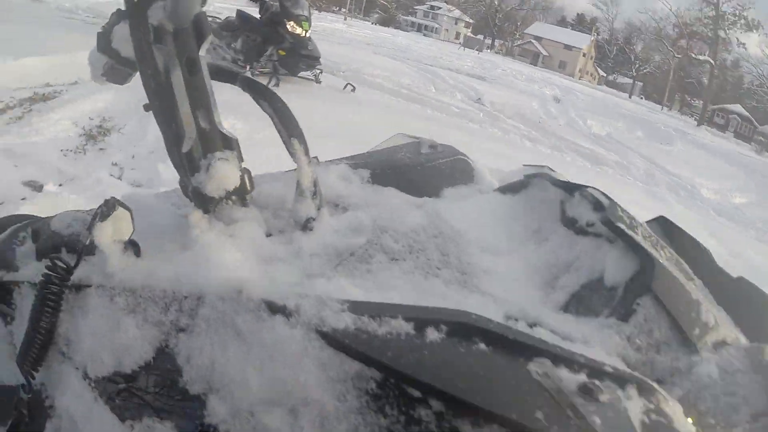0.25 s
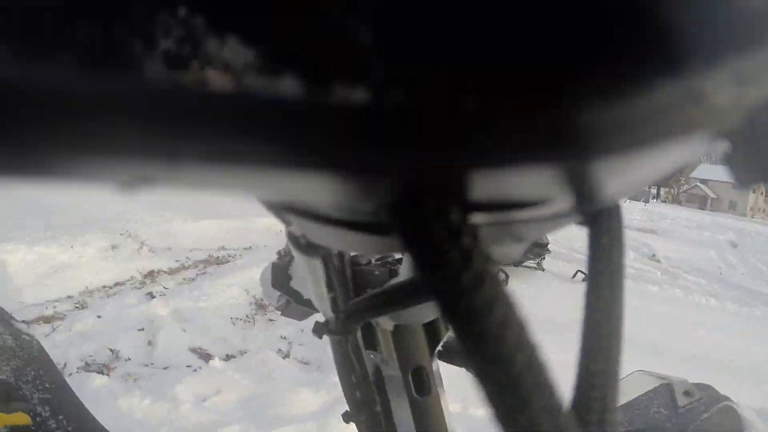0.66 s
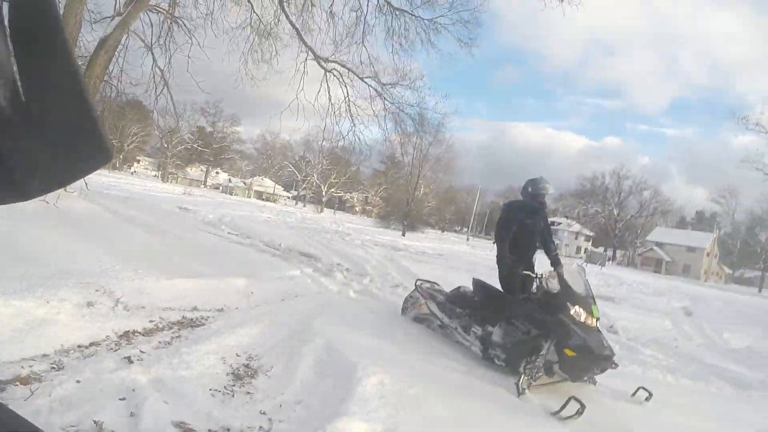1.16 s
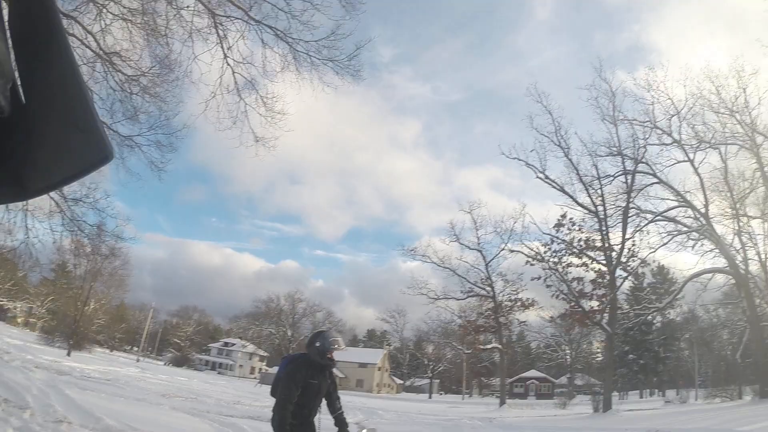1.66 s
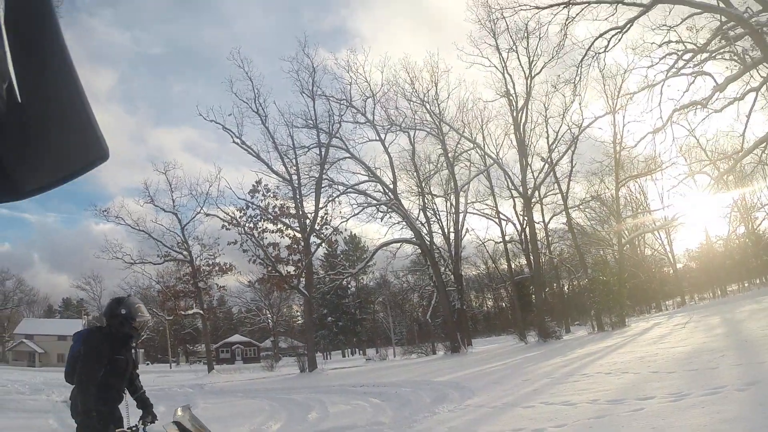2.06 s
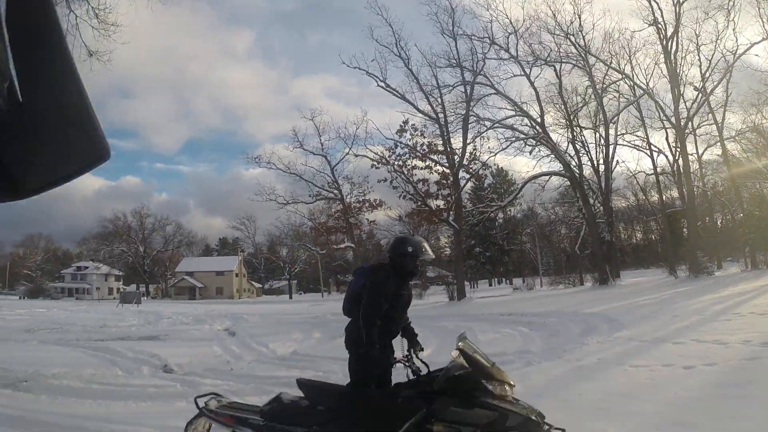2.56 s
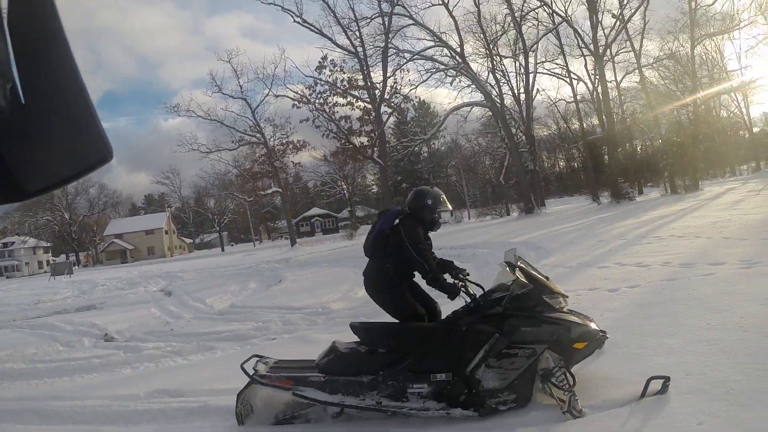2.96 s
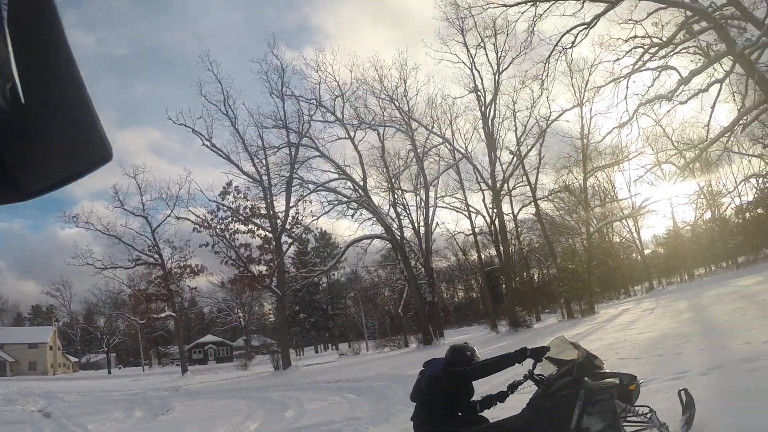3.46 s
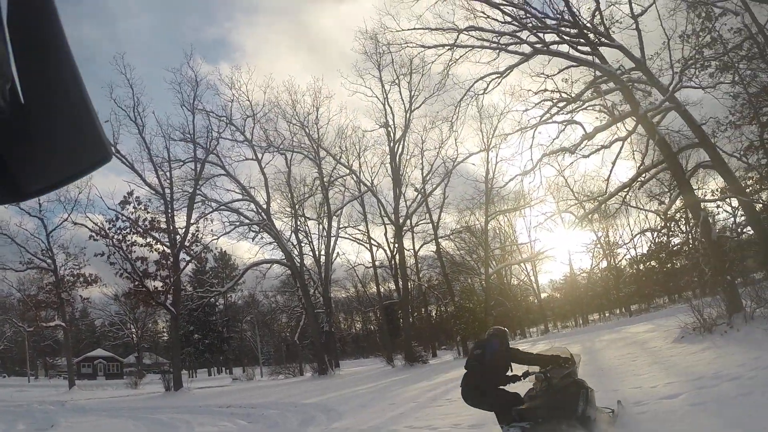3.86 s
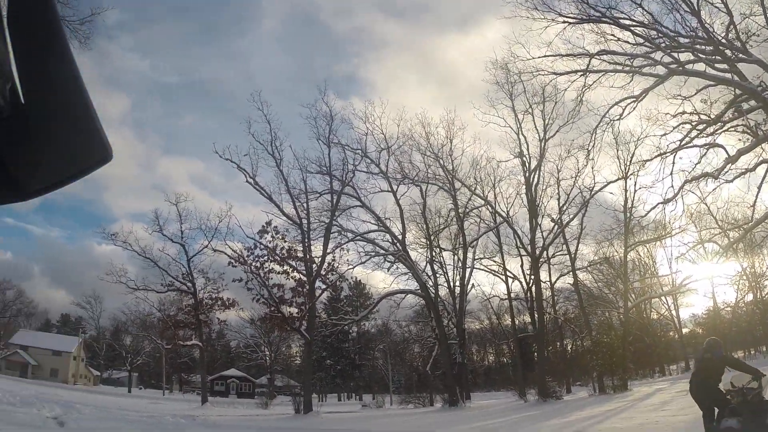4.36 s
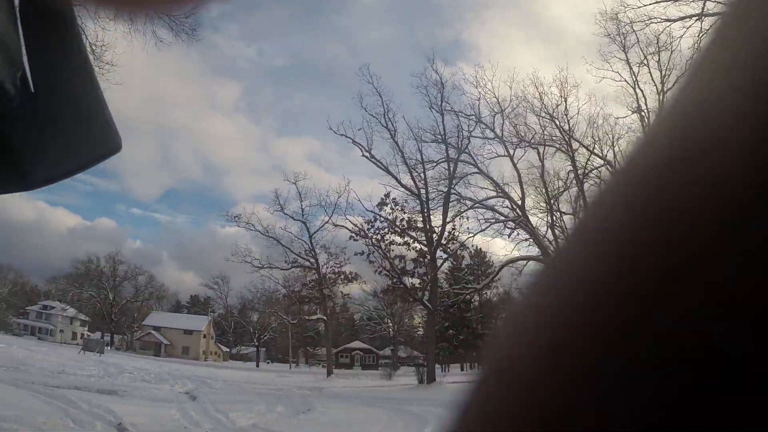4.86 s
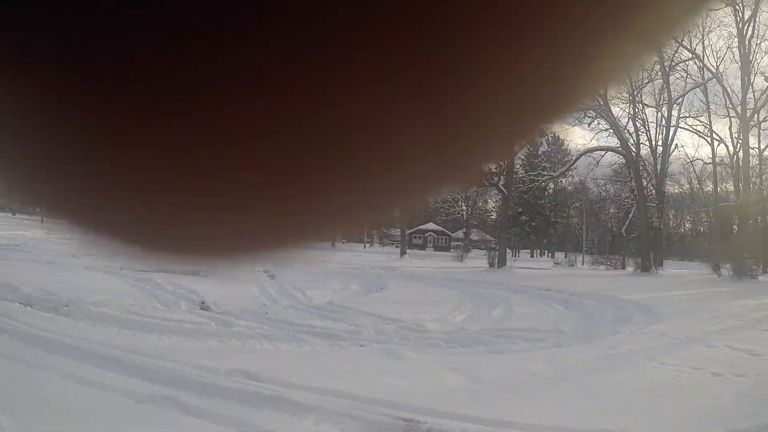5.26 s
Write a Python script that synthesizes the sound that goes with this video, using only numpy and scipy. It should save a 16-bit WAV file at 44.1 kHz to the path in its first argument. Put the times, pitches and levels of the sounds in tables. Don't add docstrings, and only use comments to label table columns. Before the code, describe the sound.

A nearby two-stroke snowmobile idles with a low, steady putter and soft clatter in an open snowy field, heard through a plastic camera housing. At about 0.2 s gloved hands grab the camera: hard knocks, hollow drumming, deep thumps and rough scraping, with especially heavy blows near 0.3, 0.55 and 0.67 s, and a firm rub just before 1 s. Afterward the idle is ducked and faint, swelling back by about 1.8 s, with thin hiss and a very faint high whine. From about 2.2 s a second snowmobile emerges, its buzz climbing and turning raspy from 3.2 s, peaking around 3.5-3.6 s with bark, airy hiss and drive hum, then dropping in pitch and fading by 4.1 s. The idle continues quietly with a faint brush. At 4.87 s loud knocks, thumps and scrapes return, thinning after 5.2 s into small ticks, low bumps and gentle rubbing until the end at 5.5 s.

```python
import sys
import numpy as np
from scipy import signal
from scipy.fft import rfft, irfft, next_fast_len
from scipy.io import wavfile
from scipy.ndimage import map_coordinates

SR = 44100
rng = np.random.default_rng(int(sys.argv[2]) if len(sys.argv) > 2 else 0)


def decibels_to_gain(level_db):
    exponent = np.asarray(level_db, float) / 20
    return 10 ** exponent


def bounce(signal):
    frames = np.transpose(np.atleast_2d(signal))
    limited = np.clip(frames, -1, 1)
    pcm = np.round(limited * 32767).astype(np.int16)
    wavfile.write(sys.argv[1], SR, pcm)


N = 242991
TIME = np.arange(N) / SR
GRID = np.fft.rfftfreq(next_fast_len(N + SR // 2), 1 / SR)

# (centre [Hz], width [Hz], level [dB])
SHELL_MODES = [(1038, 150, -13), (1327, 110, -7.5), (1640, 185, 0), (2404, 268, -1), (2920, 410, -7),
               (3600, 220, -0.5), (4460, 160, 0.5), (5470, 1100, -7), (6950, 2100, -14),
               (10000, 5000, -20.5)]


def unit(x):
    return x / np.sqrt(np.mean(x ** 2) + 1e-20)


def curves(rows, outside=None):
    seconds, *columns = np.transpose(rows)
    return [np.interp(TIME, seconds, column, outside, outside) for column in columns]


def wobble(rate):
    knots = rng.standard_normal(int(N * rate / SR) + 4)
    return map_coordinates(knots, [TIME * rate])


def filtered(x, response):
    size = 2 * (len(GRID) - 1)
    return irfft(rfft(x, size) * response, size)[:N]


def colour(points):
    hz, db = np.transpose(points)
    return decibels_to_gain(np.interp(np.log(GRID + 1), np.log(hz + 1), db, -120, -120))


def lifted(peaks):
    return decibels_to_gain(sum(db / (1 + (2 * (GRID - hz) / width) ** 2) for hz, width, db in peaks))


def modes(rows):
    total = 0
    for k, (hz, width, db) in enumerate(rows):
        damping = 1j * GRID * width
        total = total + (-1) ** k * decibels_to_gain(db) * damping / (hz * hz - GRID * GRID + damping)
    return total


def tone(turns, rough_db):
    strength = np.sqrt(2) * decibels_to_gain(rough_db * wobble(14))
    drift = 0.16 * rough_db * wobble(13) + rng.uniform(0, 8.05)
    return strength * np.sin(2 * np.pi * turns + drift)


def puffs(turns, depth, response):
    sizes = decibels_to_gain(2.5 * rng.standard_normal(int(turns[-1]) + 2))
    burst = sizes[turns.astype(int)] * 3 * np.exp(-3 * (turns % 1))
    gate = 1 - depth + depth * burst
    return unit(filtered(gate * rng.standard_normal(N), response))


def pulses(turns, scatter_db, response):
    at = np.flatnonzero(np.diff(np.floor(turns)))
    train = np.zeros(N)
    train[at] = decibels_to_gain(scatter_db * rng.standard_normal(len(at)))
    t = TIME[:SR // 40]
    smear = rng.standard_normal(len(t)) * decibels_to_gain(-60 * t / .035)
    return unit(filtered(signal.fftconvolve(train, smear)[:N], response))


def idling():
    # (time [s], exhaust [dB], clatter [dB])
    loudness = [(0, -38.5, -50.5), (.2, -42, -53.5), (1.0, -34.5, -49), (1.4, -43.5, -56), (1.7, -45, -58),
                (2.0, -41, -58), (2.4, -37.5, -51.5), (3.0, -42, -55), (3.6, -45, -48), (3.95, -46.5, -59),
                (4.2, -47.5, -58.5), (4.4, -46.5, -59), (4.7, -48.5, -60), (4.85, -53, -54.5),
                (5.51, -44.5, -61)]
    # (time [s], shaft turns a second [Hz])
    shaft_speed = [(0, 40.8), (1.5, 40), (2.6, 39.03), (3.5, 39.55), (4.1, 40.4), (5.51, 39.49)]
    # (multiple of shaft speed, level [dB])
    pipe_orders = [(1, -5.5), (2, 1.5), (3, -8), (4, -17.5), (5, -15), (6, -18.5), (7, -11.5), (8, -18),
                   (9, -33.5), (10, -16.5), (11, -13.5), (12, -16.5)]
    # (frequency [Hz], level per Hz [dB])
    clatter_colour = [(59, -38), (100, 2), (218, -5), (269, -4.5), (485, -3.5), (574, -15), (665, -14),
                      (971, -15.5), (2030, -12), (4240, -22), (15300, -46.5)]
    # (centre [Hz], width [Hz], lift [dB])
    port_peaks = [(1595, 300, 4), (2104, 600, 1.5), (2860, 78, 1), (3200, 200, 7.5), (3700, 160, 7),
                  (5700, 420, 7.5), (9800, 300, 7)]
    exhaust_db, clatter_db = curves(loudness)
    turns = np.cumsum(curves(shaft_speed)[0] * (1 + 0.0075 * wobble(6))) / SR
    pipe = sum(decibels_to_gain(db) * tone(k * turns, rough_db=1.5) for k, db in pipe_orders)
    clatter = puffs(turns, 0.17, colour(clatter_colour) * lifted(port_peaks))
    clatter = clatter * decibels_to_gain(1.4 * wobble(7))
    return decibels_to_gain(exhaust_db) * unit(pipe) + decibels_to_gain(clatter_db + 6.5) * clatter


def camera_noise():
    whine = decibels_to_gain(-85 + 2.5 * wobble(45)) * tone(13906 * TIME, rough_db=-2.0)
    hiss_colour = colour([(2000, -14.5), (8000, 0.5), (15000, -10.5), (15300, -32)])
    hiss = unit(filtered(rng.standard_normal(N), hiss_colour))
    return whine + decibels_to_gain(-80.5) * hiss


def shaking():
    # (time [s], sway [dB], judder [dB])
    unsteadiness = [(0.0, -45, -43), (0.17, -39.5, -43), (0.28, -17, -10.5), (0.9, -27.5, -27.5),
                    (0.93, -32, -9), (1.27, -49.5, -55.5), (1.96, -33.5, -35.5), (2.01, -40, -45),
                    (2.87, -32.5, -35.5), (3.13, -43.5, -48), (4.8, -42.5, -46), (4.88, -15.5, -7.5),
                    (5.09, -35, -38), (5.22, -16.5, -32), (5.37, -28, -46), (5.51, -22, -32)]
    # (time [s], level [dB], pitch [Hz], time to fall 60 dB [s], direction [sign])
    thumps = [(0.223, -17, 60.3, 0.061, 1), (0.256, 2.5, 70, 0.015, 1), (0.273, -3, 45.3, 0.087, -1),
              (0.297, -5.5, 40, 0.11, -1), (0.358, -8, 34.7, .1, -1), (0.426, -10, 55.9, 0.24, -1),
              (0.5508, 17.5, 183.6, 0.0088, 1), (0.572, -5.5, 60, 0.02, -1), (0.675, -7, 114, 0.031, -1),
              (0.699, -9.5, 97.6, 0.03, 1), (0.736, -10.5, 70.2, 0.035, -1), (.746, -15, 158, 0.061, 1),
              (0.419, -26, 195.8, 0.16, 1), (0.934, -4.5, 66.3, 0.041, 1), (0.981, -22.5, 54.5, 0.29, 1),
              (1.8, -35, 62, 0.52, 1), (2.82, -22, 64.17, 0.26, -1), (2.893, -22.5, 39.8, 0.17, 1),
              (4.874, -0.5, 73, 0.025, -1), (4.8765, -3.5, 246, 0.013, -1), (4.887, -1.5, 21.6, 0.077, 1),
              (4.989, -20, 61, 0.12, -1), (5.212, -9, 33, 0.079, -1), (5.484, -10, 69.4, 0.054, -1)]
    sway_db, judder_db = curves(unsteadiness)
    sway_colour = colour([(10, -3), (27, 5), (45, -5.5), (65, -27.5)])
    judder_colour = colour([(45, -10), (62, -4), (105, -16), (150, -24), (400, -44.5)])
    sway = unit(filtered(rng.standard_normal(N), sway_colour))
    judder = unit(filtered(rng.standard_normal(N), judder_colour))
    pushes, t = np.zeros(N + SR), TIME[:SR // 2]
    for start, db, hz, t60, way in thumps:
        onset = 1 - np.exp(-(t * hz * 5) ** 2)
        swing = np.sin(2 * np.pi * hz * t) * decibels_to_gain(db - 60 * t / t60) * onset
        pushes[round(start * SR):][:len(t)] += 1.64 * np.sign(way) * swing
    return decibels_to_gain(sway_db - 3) * sway + decibels_to_gain(judder_db - 8) * judder + pushes[:N]


def rubbing():
    # (time [s], scrape [dB], drumming of the wall over the scrape [dB])
    strokes = [
        [(.21, -39, -13), (.225, -22.5, 0), (.245, -45.5, 10), (.26, -30.5, -4), (.285, -42, 1),
         (.3, -28.5, 11.5), (.345, -49, 14), (.365, -30, 5), (.395, -55.5, 25), (.43, -35, -8), (.47, -56, 15)],
        [(.555, -34, 14), (.59, -52, -14), (.63, -39.5, -8), (.665, -46, -4), (.7, -74, 3), (.75, -48.5, 6),
         (.8, -65, -2), (.835, -41, 12.5)],
        [(.835, -61, -6), (.855, -30.5, 2), (.89, -33, -1.5), (.92, -24.5, -7), (.945, -22.5, -18),
         (.96, -30, -1), (.972, -25.5, 0.5), (.99, -70, -7)],
        [(1.68, -73, 13), (1.78, -54.5, 10), (1.85, -49.5, 5), (1.95, -62, 11)],
        [(4.25, -67, -9), (4.33, -49.5, 3.5), (4.5, -63, -16), (4.56, -66, 0)],
        [(4.865, -21, -15), (4.89, -41.5, -12), (4.905, -24, -20), (4.935, -33, -36), (4.965, -52, -15),
         (4.99, -33, -4), (5.01, -34.5, -3.5), (5.055, -29.5, -19), (5.095, -39, -16), (5.165, -40, -22)],
        [(5.165, -49, -7), (5.25, -43.5, -3), (5.32, -52, -30), (5.4, -49.5, -27.5), (5.45, -44.5, -20),
         (5.51, -51, -18)],
    ]
    # (wall [Hz], wall width [Hz], shell peak [Hz], brightness [dB per octave])
    grips = [(501, 44, 1350, -3), (466, 370, 1300, 5.5), (780, 160, 1720, -1), (267, 250, 4200, 4),
             (300, 280, 1530, -9), (250, 150, 2780, 5), (249, 170, 2700, 3.5)]
    # (frequency [Hz], level per Hz [dB])
    scrape_colour = [(530, -36.5), (900, -13), (1180, -11), (1690, -1), (2480, -3), (3380, -10),
                     (3670, -14.5), (8440, -29.5), (14100, -61), (15500, -47)]
    grains = rng.standard_normal(N) * decibels_to_gain(2.2 * wobble(90) + 2.7 * wobble(500))
    grains = grains * (1 + 9 * (rng.random(N) < 70 / SR))
    body = colour(scrape_colour) * np.abs(modes(SHELL_MODES)) ** 0.2
    out = np.zeros(N)
    for stroke, (wall_hz, width, peak_hz, bright_db) in zip(strokes, grips):
        scrape_db, drum_db = curves(stroke)
        peak = lifted([(peak_hz, 0.046 * peak_hz, 8)])
        tilt = decibels_to_gain(bright_db * np.log2(GRID / 2000 + .1))
        shell = unit(filtered(grains, body * peak * tilt))
        wall = unit(filtered(grains, modes([(wall_hz, width, 0)]) ** 1.41))
        fade_in = np.clip((TIME - stroke[0][0]) / 0.008, 0, 1)
        fade_out = np.clip((stroke[-1][0] - TIME) / 0.003, 0, 1)
        out += fade_in * fade_out * decibels_to_gain(scrape_db) * (shell + decibels_to_gain(drum_db) * wall)
    return out


def knocking():
    # (time [s], peak [dB], drum [dB], tick [dB], contact [s], drum pitch [Hz])
    knocks = [(0.2189, -8.5, -6, -13.5, 0.0086, 510), (0.254, -21, 1.5, -1.5, 0.037, 525),
              (0.2654, -31, 9, 3, 0.026, 585), (0.294, -1, -12.5, -12, 0.021, 480),
              (0.3007, -6, -1.5, -12, 0.028, 496), (0.3164, -16, -4.5, -6, 0.017, 490),
              (0.3213, -14.5, -4, -7.5, 0.021, 567), (0.3344, -23, -1, -6, 0.015, 607),
              (0.3593, -15.5, -3, -9.5, 0.03, 486), (0.4027, -21, -2, -1.5, 0.029, 546),
              (0.4239, -16.5, -11, -17, 0.013, 680), (0.4352, -40.5, 9, -8, 0.013, 510),
              (0.5503, 7, -16, -16.5, 0.0065, 470), (0.561, -39, -4, 4, 0.013, 522),
              (0.6338, -13.5, -20, -26, 0.0075, 480), (0.6525, -17.5, -18.5, -17.5, 0.013, 630),
              (0.6613, -22.5, 6.5, -2.5, 0.0051, 760), (0.6701, 8, -15.5, -29, 0.0096, 485),
              (0.6866, -37.5, -8, -0.5, 0.0066, 541), (0.7088, -46, -5, 0.5, 0.014, 517),
              (0.7459, -32.5, -16, -9, 0.013, 575), (0.8087, -9, -1.5, -25, 0.0069, 543),
              (0.9366, -5.5, -8, -20.5, 0.015, 781), (4.8665, -3, -26, -22, 0.015, 482),
              (4.877, -1.5, -16, -17, 0.0089, 492), (4.8972, -5, -21.5, -14.5, 0.0091, 595),
              (4.967, -22, -23, -15, 0.015, 813), (4.9836, -17.5, -17, -10.5, 0.02, 870),
              (5.023, -8, -33, -22, 0.011, 482), (5.0317, -19, -29, -8, 0.015, 495),
              (5.0591, -4.5, -50, -25, 0.017, 885), (5.0656, -13.5, -40, -16, 0.011, 820),
              (5.0878, -27, -26, 1, 0.013, 554), (5.1173, -34, -16, 0.5, 0.015, 961),
              (5.1436, -32, -16, 2.5, 0.014, 482), (5.173, -10.5, -22, -7, 0.01, 935),
              (5.2214, -30, -6, -8, 0.013, 485), (5.229, -26.5, -13, -7, 0.018, 703),
              (5.2547, -24.5, -18, -10, 0.0069, 511), (5.2806, -32, -15, -13, 0.014, 525),
              (5.2984, -42, -13, -9, 0.017, 509), (5.3504, -63, -26, -19, 0.015, 498),
              (5.4378, -36.5, -19, 1, 0.005, 487), (5.4716, -40, -11, -0.5, 0.012, 500)]
    force, walls, t = np.zeros((2, N + SR)), np.zeros(N + SR), TIME[:SR // 20]
    for start, db, drum_db, tick_db, contact, drum_hz in knocks:
        at = round(start * SR)
        lasting = np.clip(contact, .001, .04) * np.array([[1], [.7]])
        onset = 1 - np.exp(-t / (0.037 * lasting))
        chatter = rng.standard_normal(len(t)) * decibels_to_gain(-60 * t / lasting) * onset
        chatter = chatter / np.linalg.norm(chatter, axis=1, keepdims=True)
        force[:, at:at + len(t)] += decibels_to_gain(db + np.array([[0], [tick_db]])) * chatter
        ring = np.sin(2 * np.pi * drum_hz * t) * decibels_to_gain(-60 * t / .03)
        ring += .4 * np.sin(2 * np.pi * 1.9 * drum_hz * t) * decibels_to_gain(-60 * t / .022)
        walls[at:][:len(t)] += decibels_to_gain(db + drum_db + 1.0) * ring
    soft = 1 / (1 + 1j * GRID / 4500) ** 2
    hard = 1 / (1 + 1j * GRID / 8500) ** 2
    shell = decibels_to_gain(24.5) * filtered(force[0], soft * modes(SHELL_MODES[:5]))
    ticks = decibels_to_gain(31) * filtered(force[1], hard * modes(SHELL_MODES[5:]))
    return walls[:N] + shell + ticks


def passing():
    # (time [s], firing rate [Hz], firing multiples 1, 2, 3 [dB], bark [dB], hiss [dB])
    throttle = [(2.2, 92.55, -54, -62, -66, -64, -76), (2.3, 101.6, -43, -60, -86, -81, -88),
                (2.4, 121.6, -47, -61, -68, -62, -73), (2.5, 130, -56, -66, -53, -54, -70),
                (2.7, 135.1, -48, -65, -62, -54, -64), (3.0, 140.9, -50.5, -55, -65, -46, -65),
                (3.2, 147.3, -52.5, -59, -63, -53.5, -58), (3.3, 161.7, -44.5, -56, -40.5, -44, -54.5),
                (3.4, 178.8, -46, -43.5, -37.5, -39.5, -50.5), (3.5, 193.4, -51, -39, -44, -37.5, -51),
                (3.6, 205.5, -45, -36.5, -64, -40, -47.5), (3.66, 198.4, -70, -57, -68, -43, -56.5),
                (3.75, 175.6, -69, -56, -57, -48.5, -60.5), (3.9, 144.9, -73, -81, -57, -54.5, -63.5),
                (4.1, 121.3, -75, -75, -76, -45, -61)]
    # (multiple of firing rate, level within the bark [dB])
    high_orders = [(1.5, -18), (2.5, -15.5), (4, -18.5), (5, -24), (5.5, -20), (6.5, -18), (8, -16)]
    # (frequency [Hz], level per Hz [dB])
    bark_colour = [(350, -40), (600, -2), (800, -8), (1200, -6.5), (1500, -11), (2400, -11), (3400, -10),
                   (4000, -16.5), (5000, -16), (7000, -52)]
    # (centre [Hz], width [Hz], lift [dB])
    cowl_peaks = [(1310, 150, 2), (1745, 220, 17), (2090, 246, 18.5), (2760, 160, 14.5), (3170, 200, 5)]
    # (frequency [Hz], level per Hz [dB])
    fan_colour = [(3500, -41), (5200, -18), (5600, -1), (6200, -1), (6800, -15), (7800, -19.5),
                  (10000, -30), (15300, -48)]
    # (time [s], pitch [Hz], level [dB])
    belt_hum = [(3.3, 124.6, -78), (3.4, 136, -58), (3.5, 152.4, -43.5), (3.6, 175.2, -41),
                (3.7, 161.2, -48), (3.85, 148.3, -61.5), (3.95, 140.3, -80)]
    # (multiple of the hum pitch, level [dB])
    belt_orders = [(1, -4), (2, -2), (3, -13)]
    firing_hz, first_db, second_db, third_db, bark_db, hiss_db = curves(throttle)
    turns = np.cumsum(firing_hz) / SR
    low_db = [first_db, second_db, third_db]
    low = sum(decibels_to_gain(db) * tone(k * turns, rough_db=-0.1) for k, db in enumerate(low_db, 1))
    high = sum(decibels_to_gain(db) * tone(k * turns, rough_db=6.0) for k, db in high_orders)
    cowl = colour(bark_colour) * lifted(cowl_peaks)
    bark = .8 * pulses(turns / 2 + .006 * wobble(25), 2, cowl)
    bark += .6 * puffs(turns, .3, cowl)
    hiss = puffs(turns, 0.1, colour(fan_colour))
    belt_hz, belt_db = curves(belt_hum)
    belt_turns = np.cumsum(belt_hz) / SR
    belt = sum(decibels_to_gain(db) * tone(k * belt_turns, rough_db=2.5) for k, db in belt_orders)
    engine = low + decibels_to_gain(bark_db + wobble(12)) * (high + bark)
    fade_in = np.clip((TIME - throttle[0][0]) / 0.14, 0, 1)
    fade_out = np.clip((throttle[-1][0] - TIME) / 0.17, 0, 1)
    return fade_in * fade_out * (engine + decibels_to_gain(hiss_db) * hiss + decibels_to_gain(belt_db) * belt)


def scene():
    # (time [s], gain [dB])
    gain_moves = [(0, -4), (.22, -0.5), (.3, 3), (.55, -10), (.7, -10), (1.0, -18), (1.15, -17), (1.5, -8),
                  (1.8, 3), (2.1, -4), (4.86, 2), (4.92, 2.5), (5.3, 1.5), (5.51, 2.5)]
    ducked = decibels_to_gain(curves(gain_moves)[0]) * (idling() + camera_noise())
    return (ducked + shaking() + rubbing() + knocking() + passing())[None]


def low_pass(x):
    return signal.sosfilt(signal.butter(12, 16430, fs=SR, output="sos"), x)


def record(dry):
    clipped = dry[0] / (1 + np.abs(dry[0]) ** 8) ** (1 / 8)
    top_hz = 15300
    mix = filtered(clipped, 1 / (1 + (GRID / top_hz) ** 60))[None]
    return low_pass(mix)


dry = scene()
out = record(dry)
bounce(out)
```